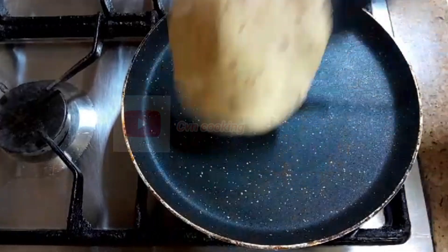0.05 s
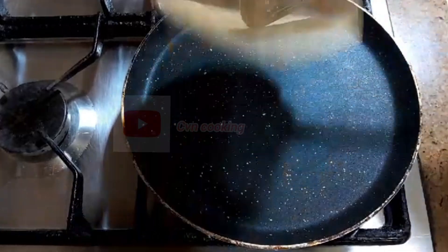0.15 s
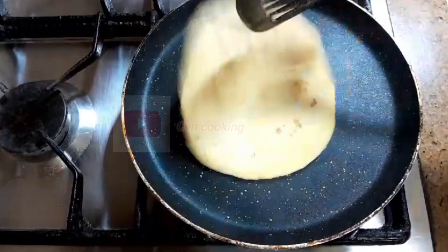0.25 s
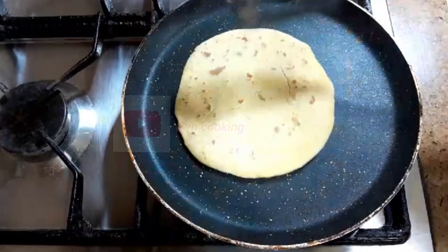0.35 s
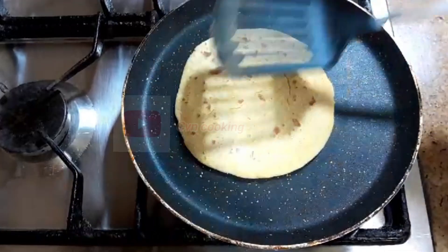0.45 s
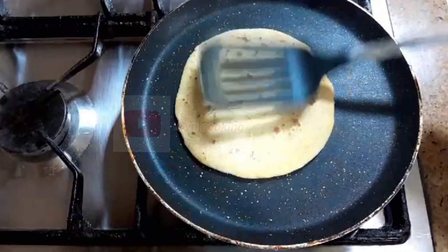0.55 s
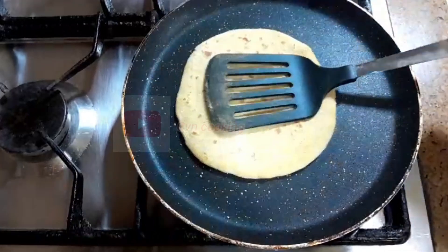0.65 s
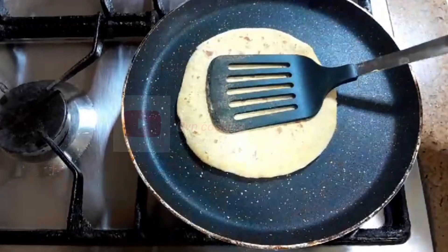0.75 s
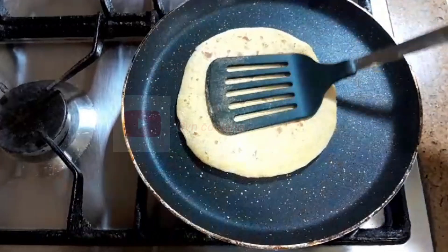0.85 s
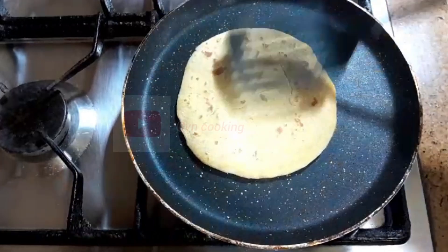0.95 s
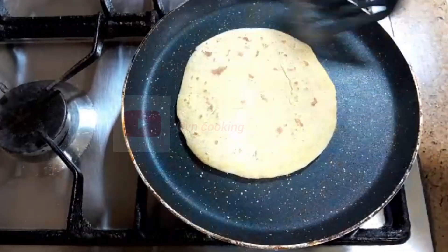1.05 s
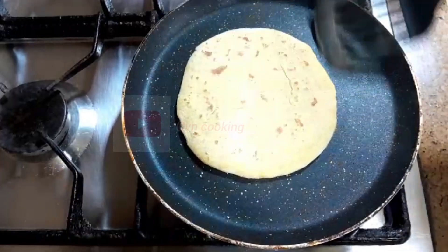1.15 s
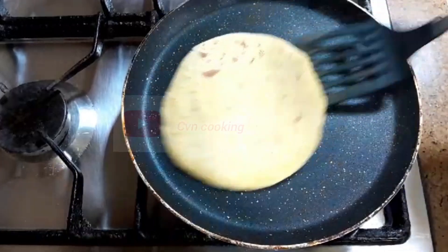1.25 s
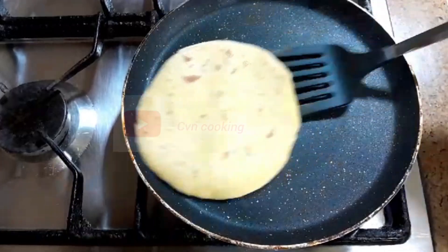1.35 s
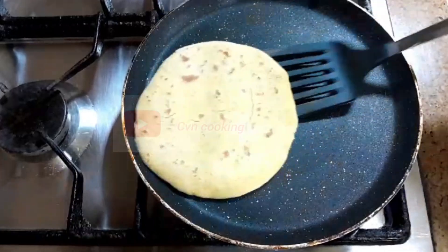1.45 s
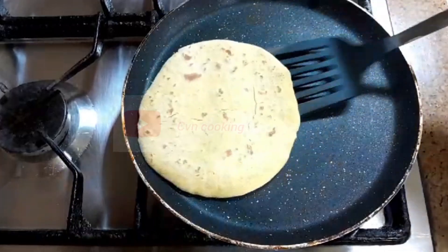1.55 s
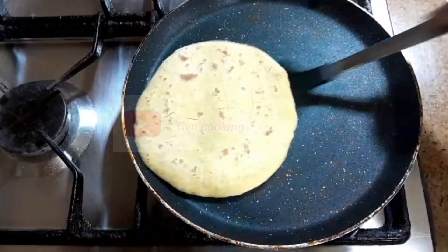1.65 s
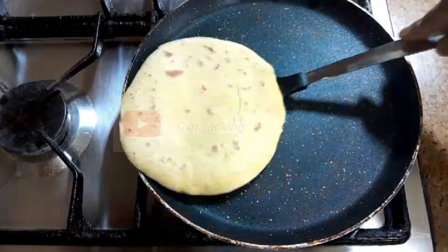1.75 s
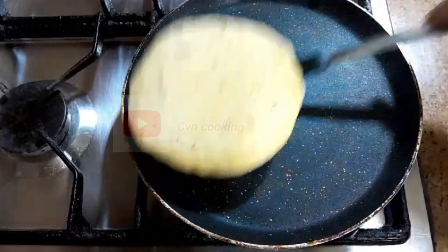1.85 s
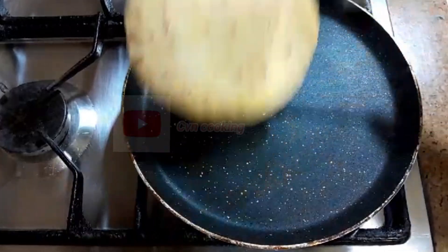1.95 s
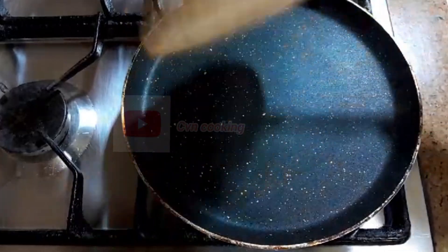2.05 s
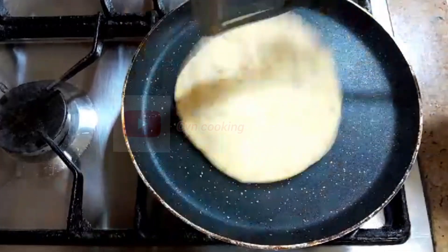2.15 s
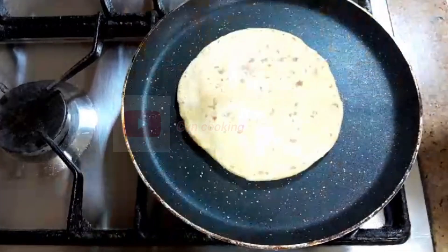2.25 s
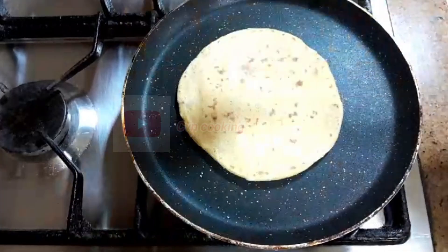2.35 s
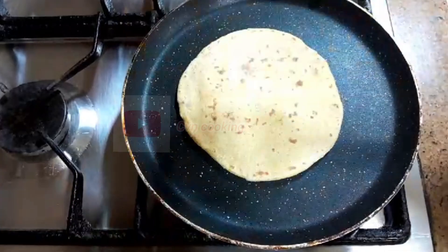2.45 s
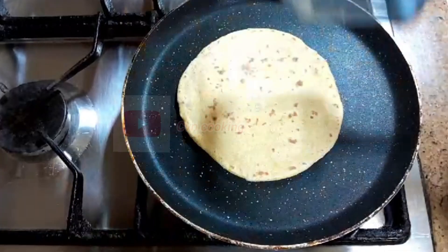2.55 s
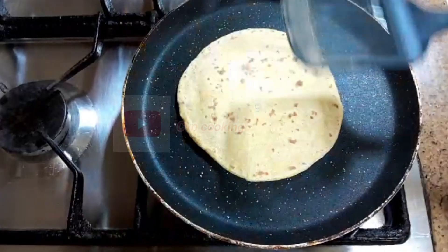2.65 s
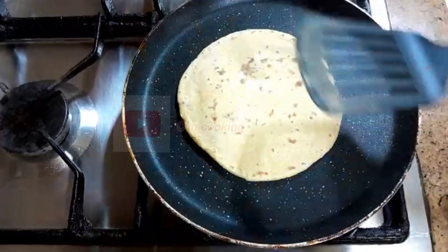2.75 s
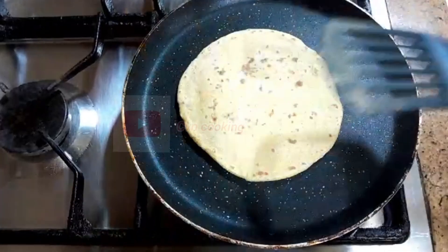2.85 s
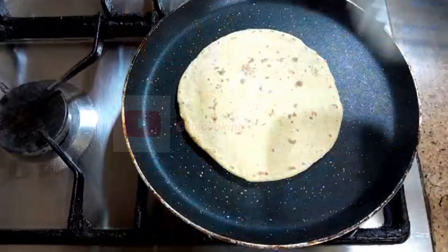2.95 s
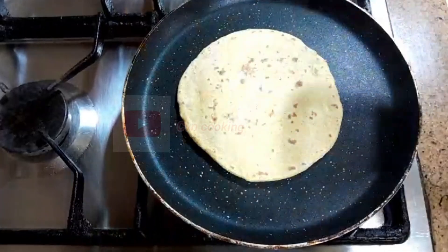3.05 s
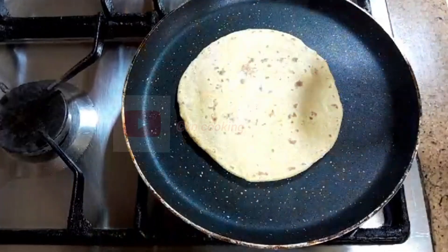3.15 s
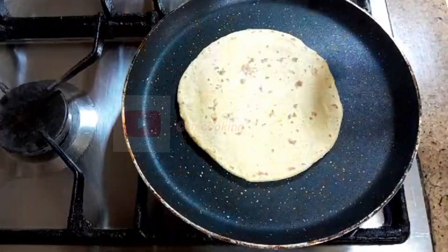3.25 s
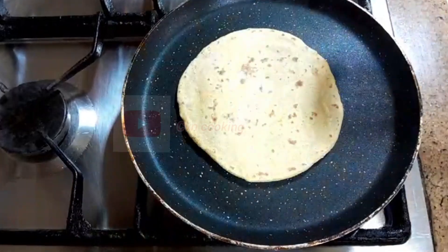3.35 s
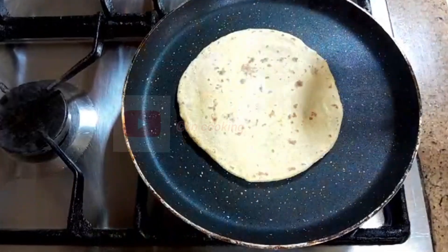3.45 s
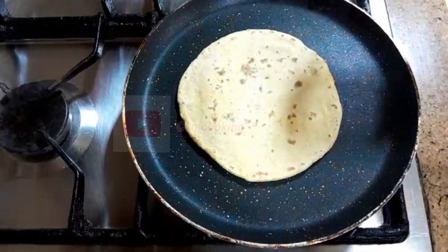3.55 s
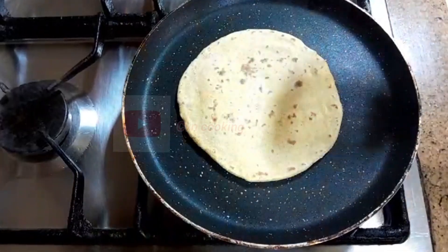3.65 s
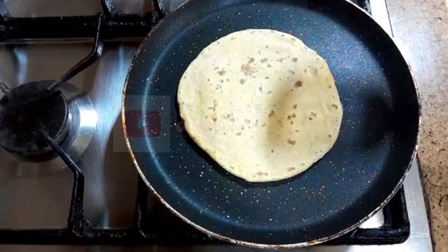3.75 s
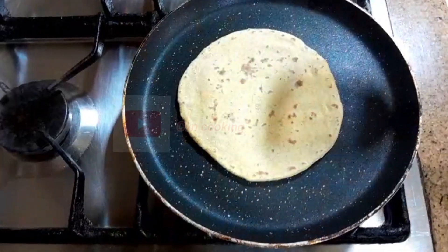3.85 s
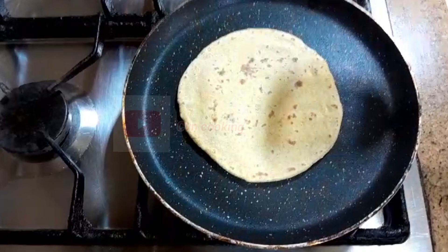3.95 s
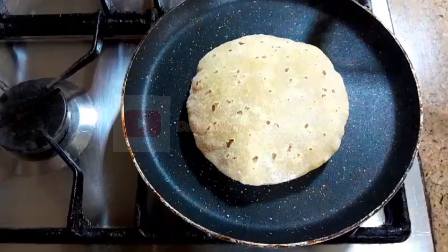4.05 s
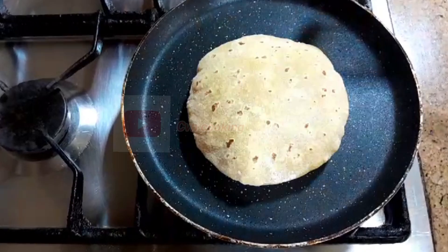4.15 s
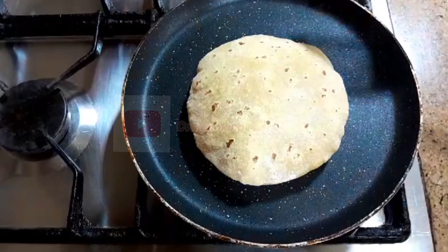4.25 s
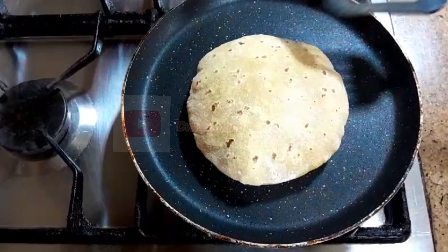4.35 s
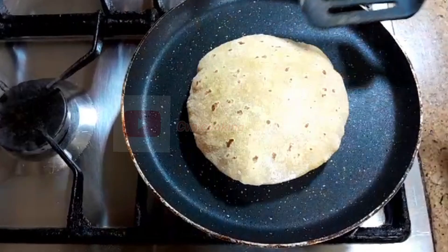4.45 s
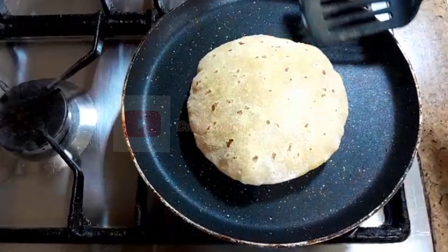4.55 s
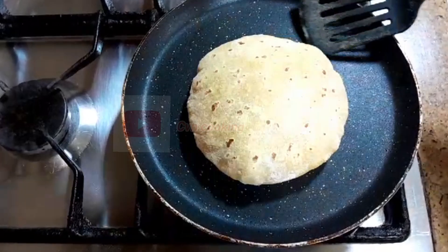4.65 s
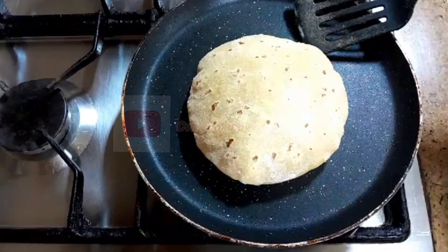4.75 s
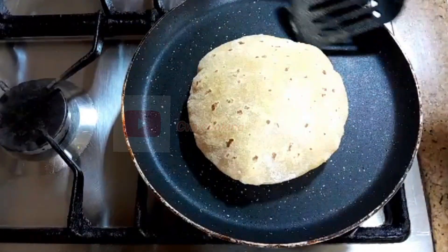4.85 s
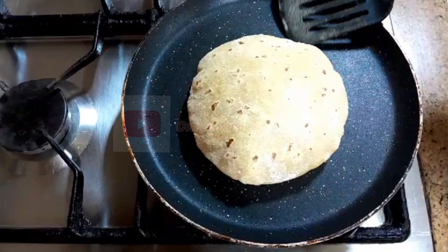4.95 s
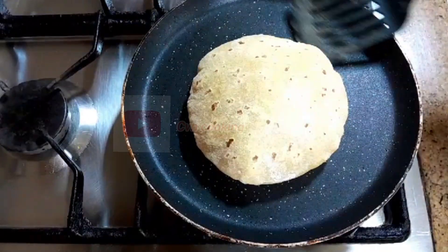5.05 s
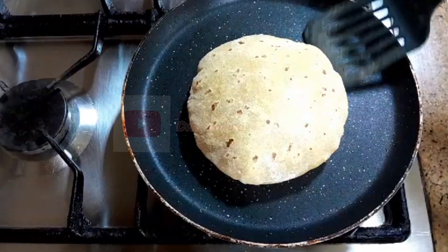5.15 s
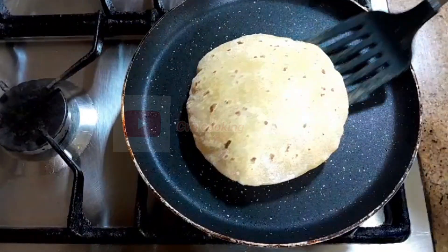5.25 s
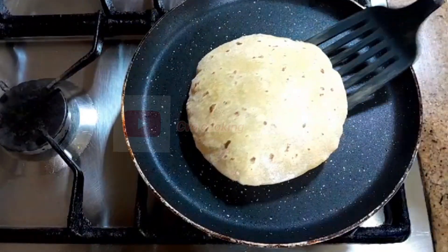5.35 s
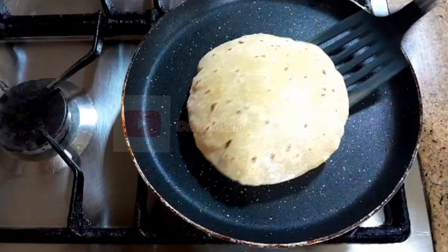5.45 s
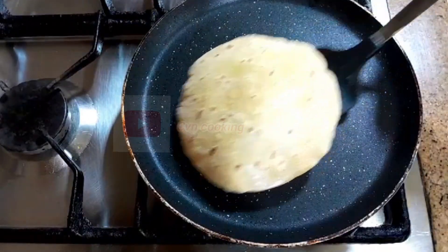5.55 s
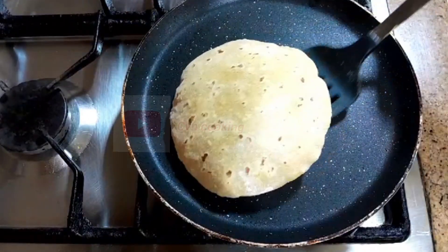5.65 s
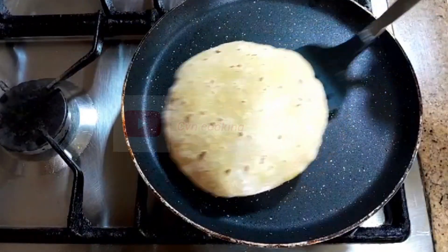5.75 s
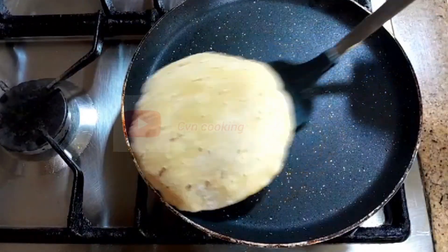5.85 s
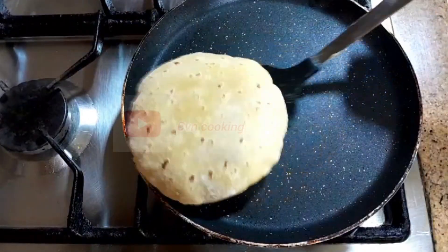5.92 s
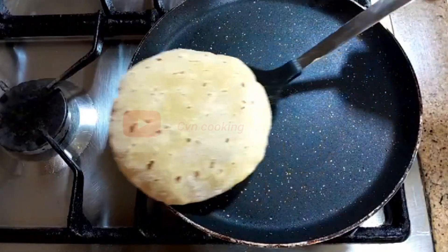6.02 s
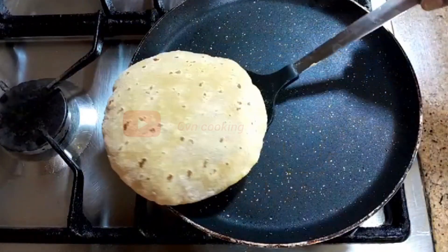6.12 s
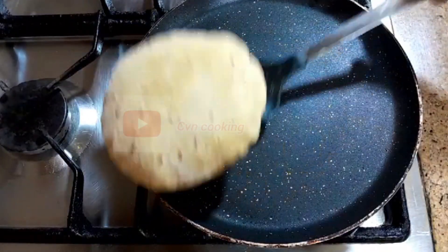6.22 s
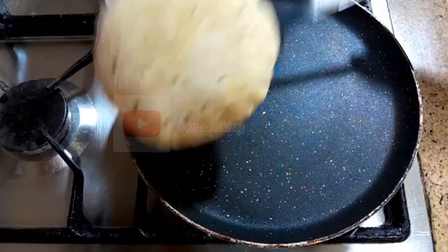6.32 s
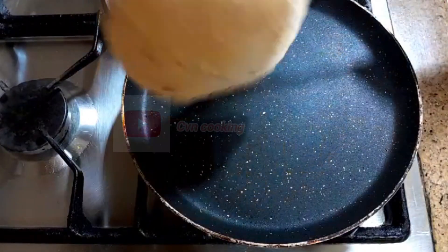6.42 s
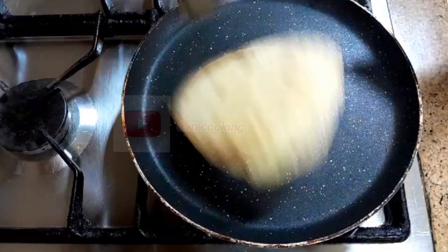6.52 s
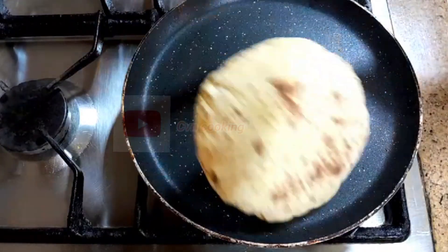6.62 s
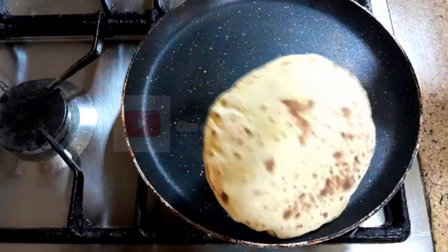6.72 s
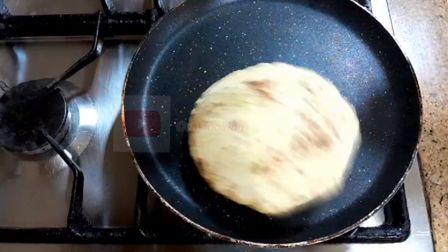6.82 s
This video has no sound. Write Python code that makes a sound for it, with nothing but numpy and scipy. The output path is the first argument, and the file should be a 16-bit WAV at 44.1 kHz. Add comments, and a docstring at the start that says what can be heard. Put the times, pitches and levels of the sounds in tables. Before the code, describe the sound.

A slotted spatula knocks, scrapes and briefly squeaks in a frying pan as soft flatbread flops over, above a low murmuring gas flame.

```python
"""In a small kitchen, a flatbread is turned three times in a frying pan over a murmuring gas flame.
The flame, its pops and the steam are shaped noise and clicks; the bread thuds by pushing the pan on its grate.
A slotted spatula knocks with clicks that ring the pan, scrapes with a rain of tiny slips,
and squeaks with gliding tones. Everything reaches left and right with the echoes of the room."""
import sys
import numpy as np
from scipy import signal
from scipy.fft import rfft, irfft, next_fast_len
from scipy.io import wavfile

SR = 44100
rng = np.random.default_rng(int(sys.argv[2]) if len(sys.argv) > 2 else 0)


def unload_wav(signal):
    """Save mono or channel-first audio to the path in sys.argv[1] as 16-bit WAV at rate SR, clipped to [-1, 1]."""
    wavfile.write(
        sys.argv[1],
        SR,
        np.round(np.clip(np.atleast_2d(signal).T, -1, 1) * 32767).astype(np.int16),
    )


N = 303445  # length in samples
TIME = np.arange(N) / SR  # s


def amp(db):
    """Turns decibels into a gain."""
    return 10 ** (np.asarray(db) / 20)


def unit(x):
    """Scales a sound to rms 1."""
    return x / np.sqrt(np.mean(x ** 2) + 1e-20)


def read(points, hz):
    """Reads a table between its points, along a log-frequency axis."""
    f, value = np.transpose(points)
    return np.interp(np.log(hz + 1), np.log(f), value)


def add(track, s, sound):
    """Mixes a sound into the track at time s, in seconds."""
    start = max(round(s * SR), 0)
    part = track[..., start:][..., :sound.shape[-1]]
    part += sound[..., :part.shape[-1]]


def colour(x, points, size=4096):
    """Gives a sound the listed spectrum, with a filter of energy 1 that only looks back in time."""
    hz = abs(np.fft.fftfreq(size, 1 / SR))
    log_gain = np.log(amp(read(points, hz)))
    spectrum = np.exp(np.conj(signal.hilbert(log_gain)))  # minimum phase
    taps = np.fft.ifft(spectrum).real[:size // 2]
    return signal.fftconvolve(x, taps / np.linalg.norm(taps))[:len(x)]


def split(x, low_hz, high_hz):
    """Splits a sound into low body, middle and treble."""
    low = signal.sosfilt(signal.butter(2, low_hz, fs=SR, output="sos"), x)
    middle = signal.sosfilt(signal.butter(2, [low_hz, high_hz], "band", fs=SR, output="sos"), x)
    high = signal.sosfilt(signal.butter(2, high_hz, "high", fs=SR, output="sos"), x)
    return low, -middle, high


def drift(hz):
    """Slow random motion of rms 1; above the given frequency it fades out."""
    size = next_fast_len(N, real=True)
    softening = 1 + (np.fft.rfftfreq(size, 1 / SR) / hz) ** 4
    return unit(irfft(rfft(rng.standard_normal(size)) / softening, size)[:N])


def swell(peak, rise, fall, shape=2):
    """A smooth rise to 1 at the peak time and a fall back to 0; shape 2 is a bell curve."""
    u = np.where(TIME < peak, (peak - TIME) / rise, (TIME - peak) / fall)
    near, out = u < 10, np.zeros(N)
    out[near] = np.exp(-.5 * u[near] ** shape)
    return out


def ring(modes, rise_cycles):
    """Metal rings as a sum of dying sines that swell over their first cycles; energy 1."""
    t = np.arange(SR // 2) / SR
    sound = np.zeros(len(t))
    for hz, db, t60 in modes:
        onset = -np.expm1(-hz * t / rise_cycles)
        sound += amp(db - 60 * t / t60) * onset * np.sin(2 * np.pi * hz * t)
    return sound / np.linalg.norm(sound)


# how alike left and right are: (frequency [Hz], likeness [0-1])
LIKENESS = [(60, 0.9), (150, 0.91), (300, 0.67), (640, 0.58), (1400, 0.0051), (3100, 0), (7000, 0),
            (15000, 0.032)]


def pair(a, b):
    """Two unrelated sounds become left and right: alike in the bass, mostly unlike in the treble."""
    size = next_fast_len(len(a), real=True)
    same = np.clip(read(LIKENESS, np.fft.rfftfreq(size, 1 / SR)), -1, 1)
    mid = rfft(a, size) * np.sqrt((1 + same) / 2)
    side = rfft(b, size) * np.sqrt((1 - same) / 2)
    return irfft(np.array([mid + side, mid - side]), size)[:, :len(a)]


# how long the room echoes: (frequency [Hz], time to fall by 60 dB [s])
ROOM_DECAY = [(60, 0.22), (200, 0.88), (1000, 0.37), (4000, 0.41), (9000, 0.39), (16000, 0.43)]


def tail():
    """Random reflections of energy 1; each band dies at its own speed."""
    hz, t, z = signal.stft(rng.standard_normal(SR * 3 // 4), SR, nperseg=256)
    decay = amp(-60 * t / read(ROOM_DECAY, hz)[:, None])
    sound = signal.istft(z * decay, SR, nperseg=256)[1]
    sound *= np.minimum(np.arange(len(sound)) / SR / 0.0081, 1)  # builds up over 8.1 ms
    return sound / np.linalg.norm(sound)


def kitchen(x, near_db, room_db, near_t60=0.035):
    """Direct sound, quick reflections from the hob and wall, then the room."""
    room = pair(tail(), tail())
    t = np.arange(room.shape[1]) / SR
    near = pair(*rng.standard_normal((2, len(t))))
    near = near * amp(-60 * t / near_t60) * np.minimum(t / 0.00094, 1)
    paths = amp(room_db) * room + amp(near_db) * near / np.linalg.norm(near[0])
    paths[:, 0] += 1  # the direct sound
    return signal.oaconvolve(x[None], paths / np.linalg.norm(paths[0]), axes=1)[:, :N]


ROAR_DB = -56.5  # the flame at rest
SING_EVEN_DB, SING_TILT = -71, 2.4  # above this level the singing leans high, by dB per octave for each dB
# the flame flares up: (time of the peak [s], rise [dB], spread to each side [s])
FLARES = [(0.903, 4.5, 0.12), (1.725, 6.5, 0.085), (3.89, 1, 0.43), (4.918, 4, 0.084), (6.04, 4, 0.17),
          (6.844, 3, 0.18)]
# level of the burner's singing: (time [s], level [dB])
SINGING = [(0, -67.5), (1.05, -67), (2, -74.5), (2.7, -76.5), (3.05, -71.5), (3.28, -75.5), (3.62, -68.5),
           (3.95, -74.5), (4.1, -70), (4.65, -76.5), (5.7, -69.5), (6.88, -68)]
# resonances that sing at the ports, before the tilt and wavering: (frequency [Hz], width [Hz], level [dB])
PORTS = [(1990, 140, 3), (2187, 70, 3), (2465, 160, -0.5), (3000, 170, -13)]
# colour of the low roar: (frequency [Hz], relative level [dB])
ROAR_COLOUR = [(20, -25), (36, -16), (60, 3), (130, 1), (230, -3), (400, -11.5), (560, -15.5), (660, -17),
               (830, -13), (1040, -13.5), (1200, -17.5), (1400, -44.5), (3000, -38), (16000, -64.5)]
# colour of the gas jet's hiss: (frequency [Hz], relative level [dB])
JET_COLOUR = [(300, -7.5), (1500, 13.5), (2900, 4.5), (3800, -5.5), (5000, 6), (5900, -3), (6500, 4),
              (7600, -4), (8400, 2), (8900, 8.5), (9900, 0.5), (12500, 5.5), (13700, 7.5), (16000, -4)]


def burner(jet_db=-73.0, flutter_db=1.5, wander_db=-1.15, waver_db=2, jet_follows=0.26):
    """A fluttering low roar, hollow singing at the ports and the thin hiss of the gas jet."""
    def noise(points):
        """Stereo noise of the given colour."""
        left_right = [colour(rng.standard_normal(N), points) for _ in range(2)]
        return unit(pair(*left_right))

    roar_db = ROAR_DB + wander_db * drift(4.2) + flutter_db * drift(25)
    for s, db, length in FLARES:
        roar_db += db * swell(s, length, length)

    sing_db = np.interp(TIME, *np.transpose(SINGING))
    tilt = SING_TILT * (sing_db - SING_EVEN_DB)
    hz = np.geomspace(500, 8000, 200)
    even_hz = PORTS[1][0]  # the tilt leaves this resonance unchanged
    ports = np.zeros((2, N))
    for f, width, db in PORTS:
        resonance = np.c_[hz, -20 * np.log10(1 + ((hz - f) / width) ** 2)]
        level_db = db + tilt * np.log2(f / even_hz) + waver_db * drift(8.8)
        ports += amp(level_db) * noise(resonance)

    hiss_db = jet_db + jet_follows * (sing_db - sing_db.mean())
    return amp(roar_db) * noise(ROAR_COLOUR) + amp(sing_db) * unit(ports) + amp(hiss_db) * noise(JET_COLOUR)


# small pops of the flame: (time [s], level [dB])
POPS = [(2.740, -59), (2.883, -53.5), (3.531, -52), (4.203, -56)]
# colour of a pop: (frequency [Hz], relative level [dB])
POP_COLOUR = [(40, -32), (150, 3), (450, 1), (900, 1), (1400, -26), (3000, -40), (16000, -68)]


def pops(span=0.0038):
    """The flame spits softly: single clicks, muffled; the level counts over a span in seconds."""
    track = np.zeros(N)
    for s, db in POPS:
        click = np.array([amp(db) * np.sqrt(span * SR)])
        add(track, s, click)
    return kitchen(colour(track, POP_COLOUR), near_db=-6, room_db=-8)


# steam escaping from under the bread: (time of the peak [s], level [dB], spread to each side [s])
PUFFS = [(0.88, -63, 0.042), (0.943, -57.5, 0.012), (2.118, -62, 0.021), (3.502, -87, 0.29),
         (6.586, -43.5, 0.0079), (6.612, -48, 0.011), (6.753, -56.5, 0.027), (6.859, -57, 0.016)]
# colour of the steam: (frequency [Hz], relative level [dB])
STEAM_COLOUR = [(500, -6), (2000, 7), (4500, -1.5), (7000, 0.5), (10000, 2), (16000, 3.5)]


def steam(fizz_db=3):
    """Damp dough fizzes briefly where it meets the hot metal: puffs of flickering noise."""
    flow = sum(amp(db) * np.exp(-.5 * ((TIME - s) / length) ** 2) for s, db, length in PUFFS)
    fizz = unit(colour(rng.standard_normal(N) * amp(fizz_db * drift(610)), STEAM_COLOUR))
    return kitchen(flow * fizz, near_db=10.5, room_db=6.5)


# the bread landing or being pressed down:
# (time [s], level [dB], contact time [s], slap of trapped air relative to the thud [dB])
THUDS = [(0.307, -32, 0.0031, -15.5), (.337, -31, 0.0073, -13), (0.644, -35.5, 0.011, -33),
         (0.714, -42, 0.01, -20), (2.205, -38.5, 0.0042, -11), (2.284, -45.5, 0.0032, -2.5),
         (2.365, -45.5, 0.0055, -1), (6.148, -47.5, 0.0083, -17), (6.607, -44, 0.0032, 6.5),
         (6.623, -56.5, 0.00127, 4), (6.651, -46.5, 0.0034, 2)]
# the pan rocking on its grate: (frequency [Hz], relative level [dB], time to fall by 60 dB [s])
GRATE = [(60.8, -14, 0.37), (73.8, 3, 0.23), (122.2, -14.5, 0.52), (153, -5.5, 0.19), (173.6, -5.5, 0.2),
         (216, -15, 0.12)]


def thuds(span=1 / 16):
    """Soft bread pushes the pan: the longer the contact, the deeper the thud; span in seconds."""
    track, t = np.zeros(N), np.arange(SR // 20) / SR
    for s, db, contact, slap_db in THUDS:
        u = t / contact
        push = np.sin(np.pi * np.minimum(u, 1)) ** 2
        thud = signal.fftconvolve(push, ring(GRATE, rise_cycles=1.17))
        thud /= np.linalg.norm(thud)
        # air squeezed from under the bread; tan(pi / 3) balances its pressure around zero
        slap = u ** 2 * np.exp(-2 * u) * np.sin(2 * np.tan(np.pi / 3) * u)
        add(thud, 0, amp(slap_db) * slap / np.linalg.norm(slap))
        add(track, s, amp(db) * np.sqrt(span * SR) * thud)
    return kitchen(track, near_db=-9, room_db=-7.5)


# squeaks of the blade edge:
# (start [s], length [s], first pitch [Hz], last pitch [Hz], level [dB], roughness [0-1])
SQUEAKS = [(1.135, 0.11, 2475, 2490, -59.5, 0.07), (1.149, 0.092, 4400, 4550, -64, .06),
           (1.17, 0.063, 3560, 3580, -65, 0.05), (1.29, 0.073, 2500, 2514, -53, 0.04),
           (1.715, .065, 1020, 768, -45.5, 0.31), (1.72, 0.0396, 1748, 1450, -45.5, .25),
           (5.112, .11, 7740, 7630, -75.5, 0), (5.16, 0.12, 5220, 5120, -72, 0),
           (6.106, 0.039, 7800, 9200, -68, 0.1), (6.141, .045, 7400, 7770, -65, .02),
           (6.178, 0.042, 7550, 6030, -69, 0.14)]
GLIDE_BEND = 1.47  # a squeak's pitch holds at first, then slides ever faster


def squeaks(waver_hz=400):
    """The edge sticks and slips fast enough to whistle; against the wall of the pan it groans."""
    track, wobble = np.zeros(N), drift(waver_hz)
    for s, length, first_hz, last_hz, db, rough in SQUEAKS:
        t = np.arange(0, length, 1 / SR)
        hz = first_hz + (last_hz - first_hz) * (t / length) ** GLIDE_BEND
        hz = hz * (1 + .5 * rough * np.interp(s + t, TIME, wobble))
        phase = 2 * np.pi * np.cumsum(hz) / SR
        tone = np.sin(phase) * signal.windows.tukey(len(t), .5)
        add(track, s, amp(db) * unit(tone))
    return kitchen(track, near_db=-3, room_db=-8.0)


# ringing of the free pan: (frequency [Hz], relative level [dB], time to fall by 60 dB [s])
PAN = [(337.7, -7.5, 0.25), (429, -12, 0.16), (561, -10.5, 0.78), (788, -1.5, 0.22), (850, -8.5, 0.32),
       (1028, 8.5, 0.054), (1149, 9.5, 0.36), (1187, -3.5, 0.23), (1540, -19, 0.25), (1740, -21, 0.12),
       (2056, -3, 0.09), (2190, 1, 0.062), (2340, -13.5, 0.13), (4330, -18, 0.19)]


def pan(x, damping=1 / 5):
    """The pan's ringing, shortened while the blade presses on it."""
    damped = [(hz, db, t60 * damping) for hz, db, t60 in PAN]
    return signal.oaconvolve(x, ring(damped, rise_cycles=1.0))[:N]


# spatula and crust striking the pan: (time [s], level [dB], chatter decay [s],
# treble relative to the middle [dB], low body relative to the middle [dB], pan ring relative to the blow [dB])
KNOCKS = [(0.2945, -30.5, .016, -5.5, 0, -11.5), (0.3642, -34, .0008, -12, -4.5, -16),
          (.628, -52, .008, 10, 12, 3.5), (0.6321, -38.5, 0.00067, 3.5, 4.5, -26),
          (0.6561, -42.5, 0.008, -20, -20, -1), (0.73, -49.5, 0.013, 3.5, 17, -24),
          (1.144, -53.5, .006, -16, -2, -16), (1.751, -49, 0.0033, -18, 16, -4),
          (2.1956, -30, 0.011, 5.5, 6, -1.5), (2.2192, -34.5, 0.0035, -7, -5.5, -25),
          (2.282, -35.5, 0.0027, -19, -15, -10), (5.2612, -48, 0.022, 15, -6, -3.5),
          (6.569, -38.5, 0.0091, 0, 17.5, -13)]
# colour of a blow: (frequency [Hz], relative level [dB])
KNOCK_COLOUR = [(60, -5), (200, -6.5), (400, -4), (700, -13.5), (1150, -6.5), (1400, -10.5), (2200, -10.5),
                (3200, -17.5), (6000, -16), (12000, -16), (16000, -21)]


def knocks(chatter_db=1, place_db=1, span=1 / 64):
    """Each blow is a click and a quickly dying chatter of the blade, and rings the pan."""
    clacks, rings, t = np.zeros((2, N)), np.zeros(N), np.arange(SR // 6) / SR
    for s, db, decay, treble_db, body_db, ring_db in KNOCKS:
        force = rng.standard_normal(len(t)) * np.exp(-t / decay)
        force *= amp(chatter_db) / np.linalg.norm(force)
        force[0] += 1  # the click
        low, middle, high = split(colour(force, KNOCK_COLOUR), low_hz=610, high_hz=3350)
        blow = amp(body_db) * low + middle + amp(treble_db) * high
        size = amp(db) * np.sqrt(span * SR)  # the level counts over the span, in seconds
        blow = size * blow / np.linalg.norm(blow)
        add(clacks, s, kitchen(blow, near_db=9.5, room_db=6.5, near_t60=0.044))
        # each spot favours other modes
        modes = [(hz, level + place_db * rng.standard_normal(), t60) for hz, level, t60 in PAN]
        add(rings, s, size * amp(ring_db) * ring(modes, rise_cycles=0.42))
    return clacks + kitchen(rings, near_db=-11, room_db=-7)


# ringing of the slotted blade as it rubs: (frequency [Hz], level before wavering [dB], time to fall by 60 dB [s])
BLADE = [(1620, 9, 0.074), (2290, -1, .04), (2495, 5, 0.06), (3520, -8, 0.037), (4240, 2, 0.086),
         (4240, -15, .04), (5170, -14, .05)]


def blade(pressure, level_db=-11, catch_db=4, catch_hz=14):
    """The rubbing edge catches now one, now another of the blade's modes."""
    modes = np.zeros(N)
    for hz, db, t60 in BLADE:
        tone = ring([(hz, 0, t60)], rise_cycles=1)
        rubbed = signal.oaconvolve(rng.standard_normal(N), tone)[:N]
        modes += amp(db + catch_db * drift(catch_hz)) * rubbed
    return kitchen(amp(level_db) * pressure * unit(modes), near_db=-1, room_db=-8)


# pushes of the spatula: (time of the hardest push [s], level of the middle [dB], rise [s], fall [s],
# treble relative to the middle [dB], low body relative to the middle [dB])
STROKES = [(1.25, -56, 0.031, 0.076, 2.5, -7), (1.345, -47, 0.081, 0.045, -2, -7),
           (1.511, -52, .03, 0.024, -8.5, -18), (1.70, -36, 0.056, 0.03, -12.5, -39),
           (5.2, -70, .065, 0.095, 3, 5), (5.291, -50, 0.026, 0.027, -3, -2),
           (5.435, -73.5, 0.036, 0.018, 12, 16), (5.533, -38.5, 0.035, 0.056, -9, -4),
           (5.695, -51.5, 0.069, 0.034, -9, -1), (5.803, -42.5, 0.022, 0.035, -16.5, -5),
           (5.91, -51, 0.047, 0.045, -3, 5), (5.97, -41.5, 0.018, 0.017, -21, -6.5),
           (6.05, -53.5, 0.033, 0.044, -6, 3.5), (6.19, -67, 0.038, 0.032, -6, 1)]
# colour of the scraping: (frequency [Hz], relative level [dB])
SCRAPE_COLOUR = [(30, -32), (60, 0.5), (240, -9.5), (540, -4), (800, -7.5), (1250, -7.5), (1700, -4),
                 (2600, -7), (4200, -9), (6600, -16), (11800, -14.5), (15800, -18.5)]
PUSH_SHAPE = 2.13  # how squarely a push swells and lets go; 2 is a bell curve
TREBLE_FOLLOWS = .75  # power of the push that the treble follows


def scrapes(slips_per_s=900, spread_db=3.5, rub=0.44, ring_db=-13, count=4):
    """The blade edge slips over the grainy coating at several spots, each a dense rain of tiny clicks."""
    power = np.zeros((3, N))
    for s, db, rise, fall, treble_db, body_db in STROKES:
        push = swell(s, rise, fall, PUSH_SHAPE)
        levels = [amp(db + body_db) * push, amp(db) * push, amp(db + treble_db) * push ** TREBLE_FOLLOWS]
        power += np.array(levels) ** 2
    body, pressure, treble = np.sqrt(power / count)
    rasp, total_force = np.zeros((2, N)), np.zeros(N)
    for _ in range(count):  # every spot has its own slips and its own reflections
        strength = amp(spread_db * np.minimum(rng.exponential(1, N), 4.5))
        happens = rng.random(N) < slips_per_s / SR
        slips = rng.standard_normal(N) * strength * happens
        force = unit(colour(unit(slips) + rub * rng.standard_normal(N), SCRAPE_COLOUR))
        low, middle, high = map(unit, split(force, low_hz=744, high_hz=6670))
        rasp += kitchen(body * low + pressure * middle + treble * high, near_db=7.5, room_db=1)
        total_force += pressure * force
    pan_ring = amp(ring_db) * kitchen(pan(total_force), near_db=0.0, room_db=-6)
    return rasp + blade(np.sqrt(power[1])) + pan_ring


def scene():
    """Adds up everything on and around the pan."""
    return burner() + pops() + steam() + thuds() + squeaks() + knocks() + scrapes()


# how the two microphones differ: (frequency [Hz], left minus right [dB])
LEAN = [(60, 1), (200, 3), (380, -5), (700, 4.5), (1290, 2.5), (2400, 0), (5000, 1), (15000, 2.5)]
EDGE_HZ = 15900  # upper band limit


def record(dry, low_cut_hz=42):
    """The two microphones differ a little in colour and lose the deepest bass; then the band limit."""
    lean_db = read(LEAN, np.fft.rfftfreq(N, 1 / SR))
    heard = irfft(rfft(dry) * amp(np.array([lean_db, -lean_db]) / 2), N)
    heard = signal.sosfilt(signal.butter(2, low_cut_hz, "high", fs=SR, output="sos"), heard)
    lowpass = signal.firwin(511, EDGE_HZ, window=("kaiser", 9), fs=SR)
    return signal.oaconvolve(heard, lowpass[None], "same")


dry = scene()
out = record(dry)
unload_wav(out)
```